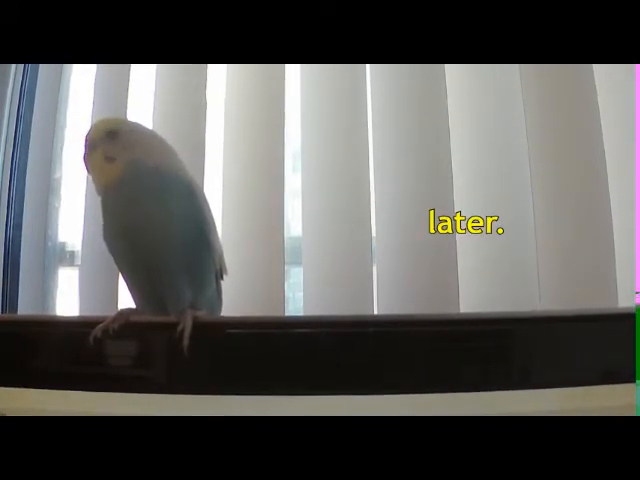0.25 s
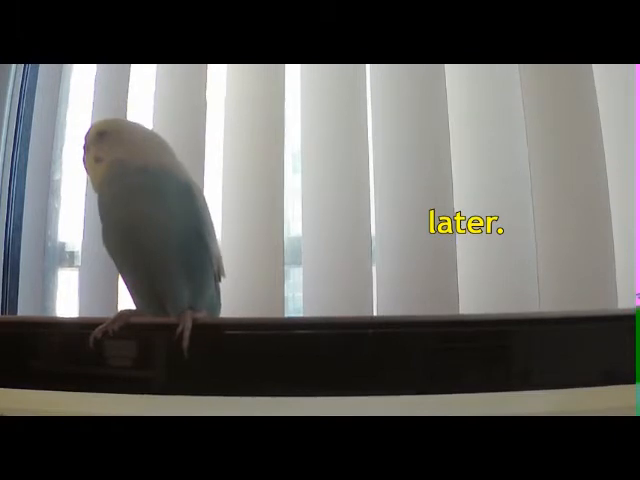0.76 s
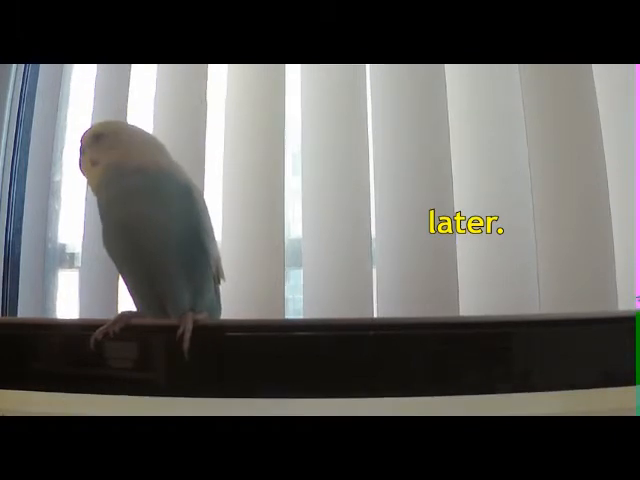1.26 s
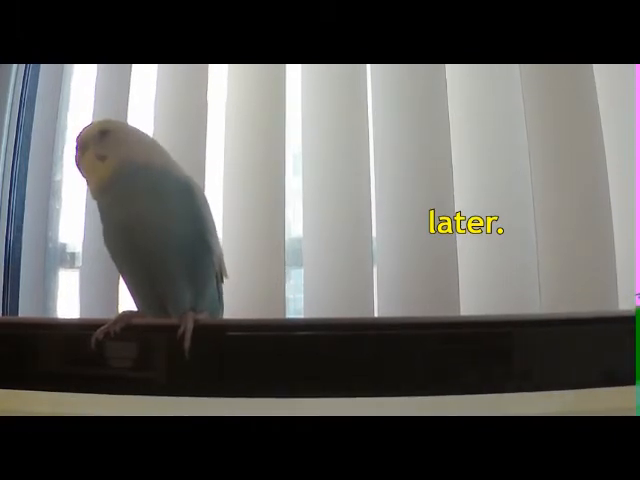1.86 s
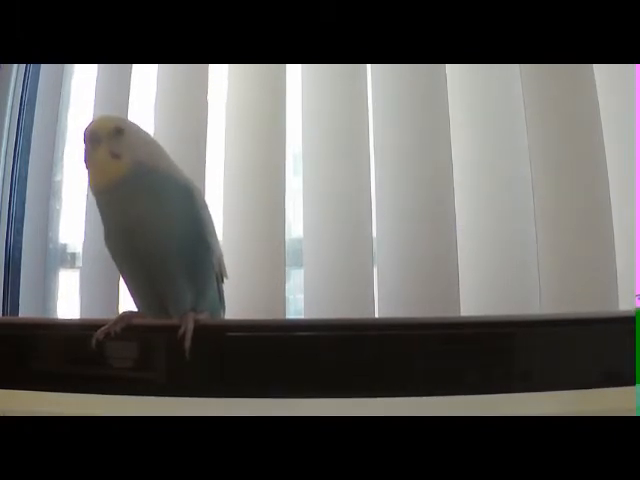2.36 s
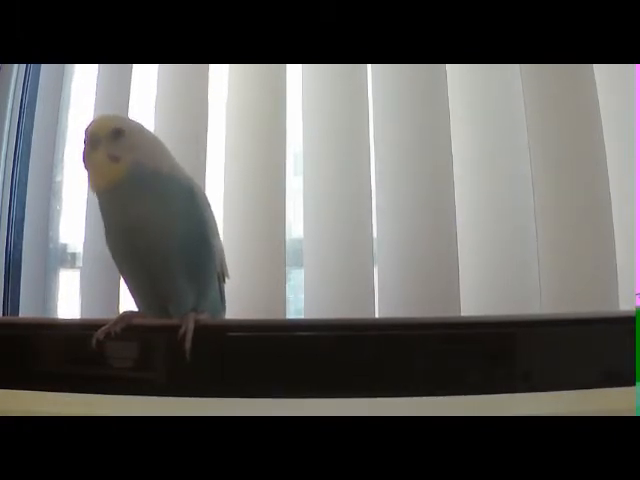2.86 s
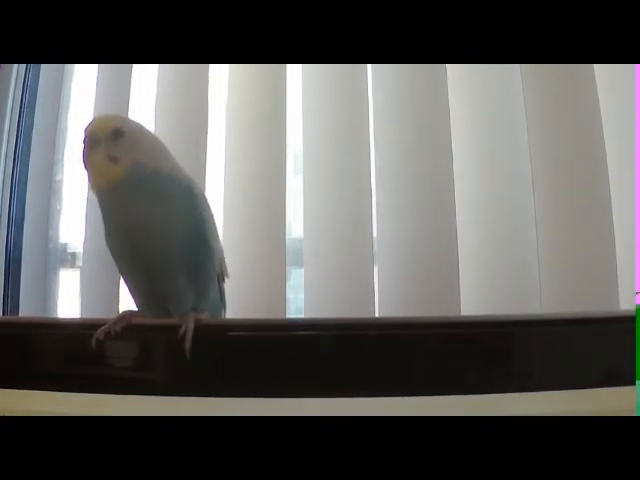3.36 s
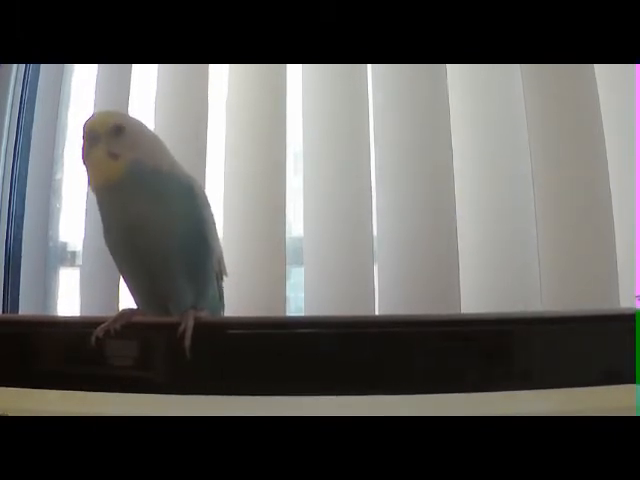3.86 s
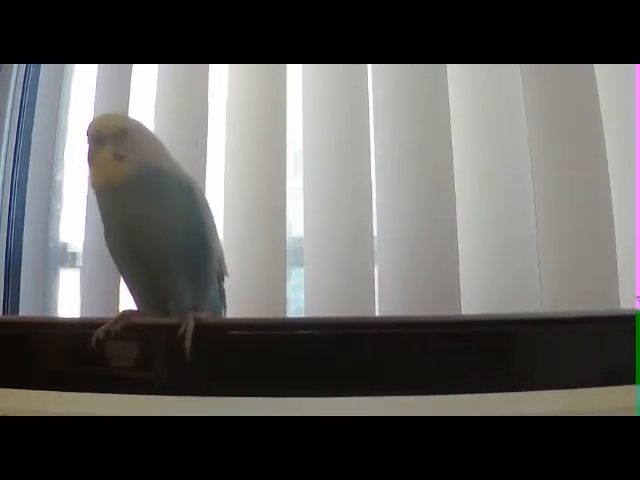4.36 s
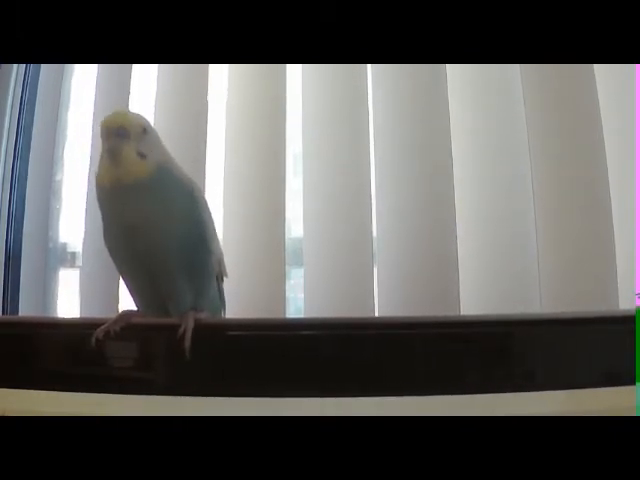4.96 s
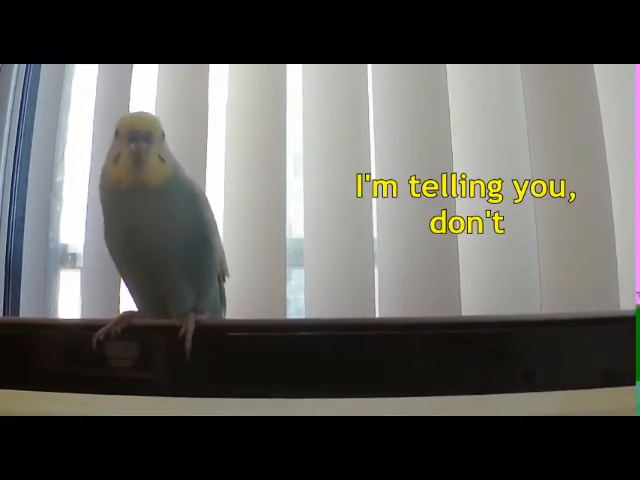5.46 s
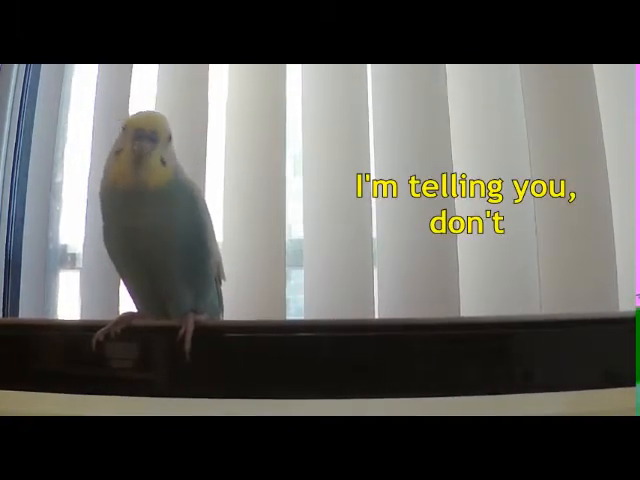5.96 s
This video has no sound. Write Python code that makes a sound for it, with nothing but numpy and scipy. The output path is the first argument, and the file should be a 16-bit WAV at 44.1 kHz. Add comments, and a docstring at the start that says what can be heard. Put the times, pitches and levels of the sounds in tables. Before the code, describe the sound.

A budgie perched close to the microphone in a small room with a short echo. After a moment of low ventilation hum it mutters in dry, creaky pulses, then jumps to one loud, cracked, piercing squeak. Isolated creaks and brief rough notes follow, then a quick string of bright falling chirps. Sharp beak clicks, a puff of air and more rasping chatter finish it.

```python
"""A budgerigar in a small room, in stereo: creaky mutters made of short voiced bursts come first, then rough
whistled notes with cracks in the voice. More creaks and single notes follow, then falling chirps with overtones.
A faint tone swells, and at the end come beak clicks, a puff of air noise and more creaking.
Whistles and creaks are sums of sine waves, cracks and clicks are short decaying waves and noise, and the
room adds an echo tail. All along, ventilation made of shaped noise and steady tones hums and rumbles behind."""
import sys
import numpy as np
from scipy import signal
from scipy.fft import rfft, irfft, next_fast_len
from scipy.io import wavfile
from scipy.ndimage import uniform_filter1d, map_coordinates

SR = 44100
rng = np.random.default_rng(int(sys.argv[2]) if len(sys.argv) > 2 else 0)


def boost(x):
    """Linear amplitude factor 10**(x/20) for a level x in decibels (scalar or array-like)."""
    u = np.asarray(x, float) / 20
    return 10 ** u


def bounce(signal):
    """Save signal as a 16-bit WAV file at the path given by the first command-line argument."""
    frames = np.transpose(np.atleast_2d(signal))
    limited = np.clip(frames, -1, 1)
    pcm = np.round(limited * 32767).astype(np.int16)
    wavfile.write(sys.argv[1], SR, pcm)


N = 273420  # length in samples

# whistled notes: ((roughness 0-1, overtone boost/dB), then the course [t/s, f/Hz, level/dB])
NOTES = [ ((0.98, -1.3), [(1.671, 2750, -39), (1.69, 2770, -37), (1.7, 2770, -42)]), ((.7, 0),
         [(1.752, 2800, -50), (1.764, 2850, -33), (1.774, 2900, -36), (1.794, 3020, -42)]), ((.8, 1),
         [(1.852, 2180, -39), (1.862, 2230, -34), (1.872, 2505, -36), (1.877, 2530, -26.5),
         (1.898, 2470, -34), (1.906, 3240, -27)]), ((0.61, -7), [(1.908, 3710, -38), (1.923, 3730, -19.5),
         (1.938, 3290, -17.5), (1.945, 3542, -6), (1.95, 3370, -9), (1.956, 3596, -6.5),
         (1.972, 3620, -23)]), ((0.65, 1), [(2.962, 2950, -18), (2.966, 2840, -36), (2.977, 2872, -16),
         (2.986, 3024, -14.5), (2.992, 2960, -24)]), ((0.49, -2), [(3.815, 3270, -28), (3.834, 3434, -20),
         (3.843, 3164, -25), (3.85, 2876, -15.5), (3.864, 2867, -20), (3.875, 2630, -31)]), ((0.45, -6),
         [(4.873, 3660, -24), (4.884, 3550, -37)]), ]
# whistle overtones before colouring: [multiple of the pitch, level/dB]
OVERTONES = [(2, -19), (3, -11), (4, -19), (5, -22), (6, -28)]
# falling chirps: [start t/s, length t/s, f/Hz the fall counts from, late upward push f/Hz, level/dB]
CHIRPS = [(4.126, 0.072, 3566, 60, -16), (4.53, 0.067, 3714, 120, -12.5), (4.599, 0.069, 3760, 60, -14.5),
          (4.669, 0.065, 3815, 200, -14.5), (4.735, .065, 3806, 490, -18), (4.811, 0.057, 3490, 380, -15)]
# how a chirp falls, with a pause midway: [share of the length, share of the fall]
FALL = [(0, 0.059), (.15, .1), (.35, .45), (.5, .53), (.7, .76), (.9, 0.99), (1, 0.98)]
# how strongly each chirp pitch sounds beside nearby reflecting surfaces: [f/Hz, level/dB]
PITCH_LOUDNESS = [(2350, 0.5), (2620, -6.5), (2800, 1.5), (2900, -9), (3060, 4), (3230, -6.5), (3450, -3.5),
                  (3800, -6.5)]
# voice inside the creak bursts: [t/s, f/Hz, roughness 0-1, beak opening as treble level/dB]
VOICE = [(0.61, 1580, 0.07, -12), (0.661, 1524, .3, -6), (0.67, 1140, 0.36, -4), (0.788, 1198, 0.38, -3.5),
         (.812, 1313, .25, -2.5), (.865, 1410, 0.4, -5.5), (.885, 1555, 0.38, -4.5), (1.0, 1703, 0.34, -1),
         (1.035, 1980, 0.28, -9.5), (1.074, 1640, .25, -21), (1.11, 1650, 0.34, -17.5),
         (1.3, 1575, 0.76, -7), (2.73, 1625, 0.22, -4), (2.855, 2310, 0.44, -12), (2.87, 2334, 0.44, -18.5),
         (3.61, 1380, .1, -18.5), (3.8, 2250, 0.68, -9), (5.66, 1970, 0.2, -4), (5.69, 1970, 0.95, 1),
         (5.72, 1680, 0.8, -30), (5.743, 2040, 0.94, -18), (5.771, 1650, 0.5, -13.5),
         (5.845, 1497, 0.44, -28), (5.885, 1220, 0.5, -16.5), (5.97, 1556, 0.54, -14),
         (6.086, 2050, 0.7, 10), (6.12, 1880, .63, -13), (6.165, 1860, 0.5, 6.5)]
# tone colour of throat and beak, made weaker or stronger where used: [f/Hz, level/dB]
THROAT = [(700, -29), (1600, 20), (2700, 17), (3600, -13.5), (4600, -12.5), (6500, -9.5), (8500, -5),
          (11000, -14), (15500, -18)]
# boost of a burst's second partial over its treble: [f/Hz, level/dB]
SECOND_PARTIAL = [(2250, 4.5), (2600, 9), (2950, 5.5), (3300, -2.5), (4000, -14), (4800, -19)]
# throat resonances rung by every burst: [f/Hz, time to fall 60 dB t/s, typical level/dB against the burst]
THROAT_RINGS = [(1610, .04, -15), (1955, .05, -10)]
# evenly spaced bursts, before scatter: [first t/s, last t/s, count, first level/dB, last level/dB]
RUNS = [(.6106, .6462, 3, -28, -23), (.6592, .6907, 5, -24, -29), (.7051, .7859, 8, -24, -25),
        (.7974, .9408, 13, -21, -22), (.9559, .981, 3, -23, -24), (.9988, 1.0724, 7, -24, -18),
        (1.0979, 1.106, 2, -20, -19), (1.1238, 1.1754, 3, -19, -22), (1.2504, 1.266, 3, -30, -30),
        (5.6606, 5.7134, 6, -30, -31), (5.7429, 5.8454, 17, -19.5, -23), (5.8603, 5.9221, 6, -25, -29),
        (5.9498, 5.9712, 2, -25, -23), (6.0822, 6.0927, 2, -43, -40), (6.1063, 6.13, 3, -30, -31)]
# single creak bursts: [t/s, level/dB]
LONE_BURSTS = [(1.2068, -24), (1.2243, -33), (1.2959, -33), (2.7278, -26.5), (2.8556, -31), (2.868, -28),
               (2.8734, -17.5), (2.8808, -27), (3.6113, -29.5), (3.72, -37.5), (3.7998, -29),
               (5.7304, -14.5), (5.9331, -20), (6.1658, -45)]
# sharp cracks: voice breaks in the loud note, then beak clicks; before a shared boost: [t/s, level/dB]
CRACKS = [(1.944, -19), (1.953, -12), (2.082, -29), (5.598, -13), (5.601, -12.5), (5.604, -15),
          (5.617, -29)]
# puffs of air through the beak, before a random waver: [t/s, level/dB]
PUFF = [(5.603, -32), (5.615, -59), (5.65, -39.5), (5.68, -37), (5.71, -45), (5.73, -37)]
# bird's left-right balance: [f/Hz, left minus right level/dB]
BIRD_PAN = [(3000, 2), (8000, -0.34), (13000, 6)]
# slower part of the room's decay: [f/Hz, time to fall 60 dB t/s]
ROOM = [(1000, .3), (3000, .34), (8000, .22), (15000, .14)]
# colour of the ventilation noise, relative: [f/Hz, level/dB]
AIR = [(59, -46), (100, -6.5), (205, -6), (254, -7), (307, -10), (449, -14), (521, -11.5), (1000, -18.5),
       (1090, -20.5), (1740, -23.5), (5340, -38), (15700, -40)]
# colour of the rumble, relative: [f/Hz, level/dB]
RUMBLE = [(4.7, -17), (8.0, 4), (22, -1.5), (38, -15.5), (68, -17), (86, -34), (100, -27), (130, -58),
          (220, -120)]
# rumble swells, before a shared boost: [t/s, level/dB]
SWELL = [(0.0, -28), (0.17, -31), (4.82, -30), (6.2, -27.5)]
# fan tones, before a waver: [f/Hz, level/dB, left minus right level/dB, left's lead/radians]
FAN_TONES = [(60, -45.5, -11, .5), (125.7, -56, -6, 0.33), (255.2, -39, -15.5, -0.19), (358.1, -53, -7, 0),
             (518, -55.5, -5, -0.092), (1014, -58, -16, 0)]
# how alike left and right are in the air noise: [f/Hz, likeness -1 to 1]
ALIKE = [(60, -0.49), (180, 0.47), (550, 0.34), (1650, 0.59), (4970, 0.27), (15000, -0.2)]
# faint tone near 800 Hz, before a waver: [t/s, level/dB]
FAINT = [(4.6, -70), (4.95, -49.5), (5.55, -50), (6.2, -58)]

CHIRP_ROUGH, CHIRP_UPPER_DB = 0.29, 1.5  # roughness 0-1, overtone boost
CHIRP_RISE_S, CHIRP_RISE_DB = 0.01, 5.5  # swell at the start
CHIRP_END_S, CHIRP_END_DB = 0.002, 2.5  # fade at the end
COLD_RISE_S, COLD_RISE_DB, PAUSE_S = 0.033, 7, .1  # extra, slower swell after a pause
BOTTOM_HZ = 2418  # the full fall leads here
LINGER_AT, LINGER_WIDTH, DIP_AT, DIP_WIDTH = .7, .15, .66, 0.044  # shares of the chirp length
GAP_SCATTER_S, SIZE_SCATTER_DB = .0009, 1.7  # unevenness within runs of bursts


def whistles():
    """A gliding tone; roughness makes its level and pitch flutter, smears its overtones and adds hiss."""
    out, air = np.zeros((2, N))
    for (rough, upper_db), note in NOTES + [chirp(*row) for row in CHIRPS]:
        s, hz, db = np.transpose(note)
        start = round(s[0] * SR)
        t = np.arange(start, round(s[-1] * SR)) / SR
        size = len(t)
        pitch = np.interp(t, s, hz) * (1 + .055 * rough * wobble(300, size))
        phase = 2 * np.pi * np.cumsum(pitch) / SR
        upper = 0
        for k, level_db in OVERTONES:
            colour_db = upper_db + along(THROAT, k * pitch) * .5
            loudness = boost(level_db + colour_db + 3 * wobble(150, size))
            wave = np.sin(k * phase + 1.9 * rough * wobble(900, size))
            damping = np.clip(k * pitch / 2500 - 1.9, .15, 1)  # the tract damps 5-6 kHz
            upper = upper + loudness * wave * (k * pitch < SR / 2) * damping
        upper = upper * np.clip(pitch / 800 - 2.7, .25, 1)  # weaker at the bottom of a glide
        edges = np.clip(np.minimum(t - t[0], t[-1] - t) / .0015, 0, 1)
        flutter = 1 + rough * (.5 * wobble(550, size) + .4 * wobble(1500, size))
        level = np.sqrt(2) * edges * np.interp(t, s, boost(db)) * flutter
        out[start:][:size] += level * (np.sin(phase) + upper)
        air[start:][:size] += level * rough * boost(upper_db) * rng.standard_normal(size)
    hiss = boost(-10) * air
    return out + filtered(hiss, lambda hz: boost(0.93 * along(THROAT, hz)) * np.clip(hz / 5000 - 1, 0, 1))


def chirp(start, length, top_hz, hook_hz, db):
    """A falling glide: late on it may linger, dip and hook up; its level follows its pitch."""
    t = np.linspace(0, length, num=60)

    def bump(at, width):
        return np.exp(-((t / length - at) / width) ** 2)

    def ramp(s, seconds):
        return np.clip(1 - s / seconds, 0, 1)

    linger = hook_hz * bump(LINGER_AT, LINGER_WIDTH) * (1 - bump(DIP_AT, DIP_WIDTH))
    fallen = np.interp(t / length, *np.transpose(FALL))
    hz = top_hz + (BOTTOM_HZ - top_hz) * fallen + linger
    cold = not any(0 < start - row[0] < PAUSE_S for row in CHIRPS)  # no chirp began just before
    soft_db = CHIRP_RISE_DB * ramp(t, CHIRP_RISE_S)
    soft_db = soft_db + cold * COLD_RISE_DB * ramp(t, COLD_RISE_S) ** .5
    soft_db = soft_db + CHIRP_END_DB * ramp(length - t, CHIRP_END_S)
    course = np.transpose([start + t, hz, db + along(PITCH_LOUDNESS, hz) - soft_db])
    return (CHIRP_ROUGH, CHIRP_UPPER_DB), course


def creak():
    """The syrinx opens in short bursts: each a pop, then a few cycles of a pulsed voice through the throat."""
    out, t = np.zeros(N + 2048), np.arange(1024) / SR
    k = np.r_[1, 1.5, 2:15][:, None]  # multiples of the pitch
    when, *controls = np.transpose(VOICE)
    for s, db in bursts():
        hz, rough, treble_db = (np.interp(s, when, c) for c in controls)
        second_db = treble_db + along(SECOND_PARTIAL, 2 * hz)
        hz = hz * (1 + 0.052 * rough * rng.standard_normal())
        pitch = hz * (1 + 0.13 * rough * wobble(1090, len(t)))
        phase = 2 * np.pi * np.cumsum(pitch) / SR
        contrast = 1.13 + 4.0 * rough ** 2  # rough bursts ring a narrower beak
        high = boost(along(THROAT, k * hz) * contrast) * (k > 2) * (k * hz < SR / 2)
        # uneven cycles fill in halfway, at 1.5 times the pitch
        low = (k == 1) + (k == 2) * boost(second_db) + (k == 1.5) * .5 * rough
        gain = low / np.linalg.norm(low) + boost(treble_db) * high / np.linalg.norm(high)
        # in a rough voice the partials lose step
        scatter = 2.11 * rough * k ** 0.4 * np.array([wobble(699, len(t)) for _ in k])
        length = .007 - 0.0037 * rough  # rough bursts are shorter
        shape = (1 - np.exp(-t / .0004)) * np.exp(-(t / length) ** 1.7)
        voice = shape * (gain * np.sin(k * phase + scatter)).sum(0)
        pop = 1.2 * rough * np.sin(2 * np.pi * 1300 * t) * np.exp(-t / .0003)
        ring = 0
        for tone, t60, level_db in THROAT_RINGS:
            ring_db = level_db + 3 * rng.standard_normal() - 60 * t / t60
            ring = ring + boost(ring_db) * np.sin(2 * np.pi * tone * t)
        out[round((s - .0004) * SR):][:len(t)] += boost(db + 0.5) * (pop + ring + voice)
    return out[:N]


def bursts():
    """Time and level of every burst: runs are evenly spaced, then made a little uneven."""
    runs = np.vstack([np.linspace((first, first_db), (last, last_db), count)
                      for first, last, count, first_db, last_db in RUNS])
    runs = runs + rng.standard_normal(runs.shape) * (GAP_SCATTER_S, SIZE_SCATTER_DB)
    return np.vstack([runs, LONE_BURSTS])


def cracks_and_puffs():
    """Sharp cracks, each a quickly dying wave with a short noisy rattle, plus puffs of air noise."""
    out, t = np.zeros(N), np.arange(200) / SR
    for s, db in CRACKS:
        snap = -np.sin(2 * np.pi * 5500 * t) * np.exp(-t / .00013)
        rattle = .6 * uniform_filter1d(rng.standard_normal(len(t)), size=3) * np.exp(-t / .0007)
        out[round(s * SR):][:len(t)] += boost(db + 4.5) * (snap + rattle)
    s, db = np.transpose(PUFF)
    air = unit(filtered(rng.standard_normal(N), lambda hz: boost(.5 * along(THROAT, hz))))
    puff_db = np.interp(np.arange(N) / SR, s, db, -120, -120) + 2.1 * wobble(150)
    return out + boost(puff_db) * air


def room(x):
    """Near surfaces add a quick decay, then each frequency dies at its own speed, much alike on both sides."""
    hz, t, z = signal.stft(rng.standard_normal((2, SR // 2)), SR, nperseg=128)
    decay = boost(-60 * t / along(ROOM, hz)[:, None]) + boost(-60 * t / .05)
    mid, side = signal.istft(z * decay, SR, nperseg=128)[1]
    tail = boost(-10) * np.array([mid + .6 * side, mid - .6 * side]) / np.linalg.norm(mid)
    delayed = np.pad(x, (150, 0))  # delay in samples
    return signal.fftconvolve(delayed[None], tail, axes=1)[:, :N]


def ventilation():
    """Air noise, a swelling rumble that differs left to right, unsteady fan tones and a faint wavering tone."""
    t = np.arange(N) / SR
    out = boost(-35.5) * rush(AIR, ALIKE)
    swell_db = np.interp(t, *np.transpose(SWELL)) + 4.5
    out += boost(swell_db) * rush(RUMBLE, [(20, -0.4), (90, 0.34)])  # likeness: [f/Hz, -1 to 1]
    for hz, db, pan_db, lead in FAN_TONES:
        phase = 2 * np.pi * np.cumsum(hz + 1.78 * wobble(6)) / SR
        level_db = db + 0.64 * wobble(5.2) + [[pan_db / 2], [-pan_db / 2]]
        out += np.sqrt(2) * boost(level_db) * np.sin(phase + [[lead / 2], [-lead / 2]])
    faint_db = np.interp(t, *np.transpose(FAINT)) + 3 * wobble(12)
    faint_phase = 2 * np.pi * np.cumsum(800 + 5 * wobble(10)) / SR
    return out + boost(faint_db) * np.sin(faint_phase)


def rush(spectrum, alike):
    """Stereo noise of rms 1: the shares of mid and side set how alike left and right are."""
    def response(hz):
        turn = np.arccos(np.clip(along(alike, hz), -1, 1)) / 2
        return boost(along(spectrum, hz)) * [np.cos(turn), np.sin(turn)]

    mid, side = filtered(rng.standard_normal((2, N)), response)
    return unit(np.array([mid + side, mid - side]))


def unit(x):
    """Scale to rms 1."""
    return x / np.sqrt(np.mean(x ** 2) + 1e-20)


def along(points, hz):
    """Read a value between [f/Hz, value] points on a log frequency axis."""
    f, v = np.transpose(points)
    return np.interp(np.log(hz + 1), np.log(f + 1), v)


def wobble(rate, size=N):
    """A smooth random curve with rate random points a second."""
    points = rng.standard_normal(int(size * rate / SR) + 4)
    return map_coordinates(points, [np.arange(size) * rate / SR])


def filtered(x, response):
    """Multiply the spectrum of x by a response of frequency."""
    m = next_fast_len(N + 8192)
    return irfft(rfft(x, m) * response(np.fft.rfftfreq(m, 1 / SR)), m)[..., :N]


def scene():
    """The bird direct, its echo in the room, and the ventilation."""
    bird = whistles() + creak() + cracks_and_puffs()
    near = filtered(bird, lambda hz: boost(along(BIRD_PAN, hz) * [[.5], [-.5]]))
    return near + room(bird) + ventilation()


def band_limit(x):
    """A steep low-pass at the top of the band."""
    return signal.sosfilt(signal.butter(12, 15860, fs=SR, output="sos"), x)


def record(dry):
    """Peaks beyond full scale are cut flat."""
    mix = np.clip(dry, -1, 1)
    return band_limit(mix)


dry = scene()
out = record(dry)
bounce(out)
```